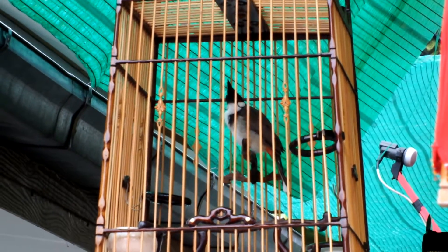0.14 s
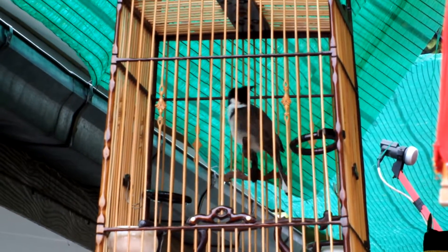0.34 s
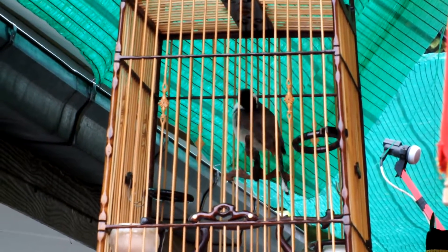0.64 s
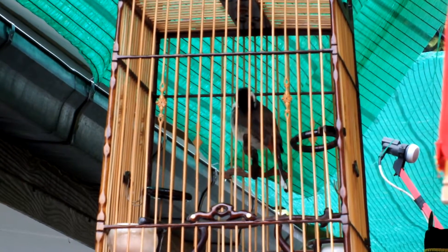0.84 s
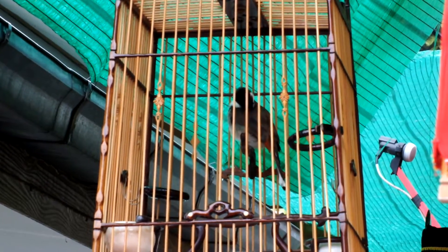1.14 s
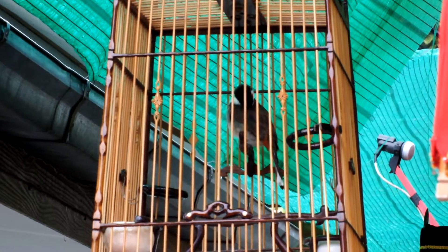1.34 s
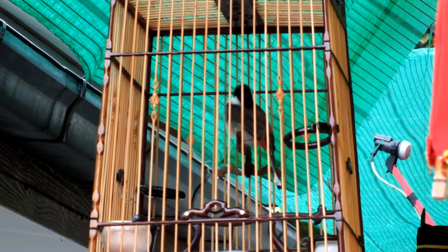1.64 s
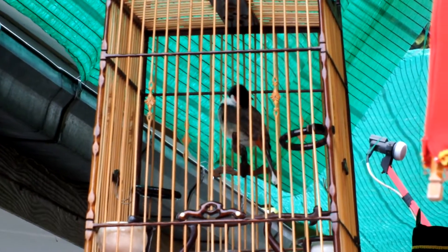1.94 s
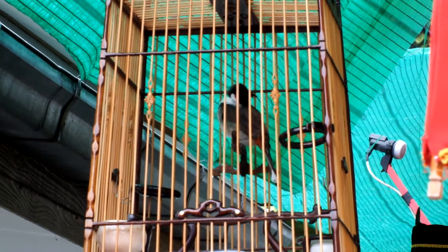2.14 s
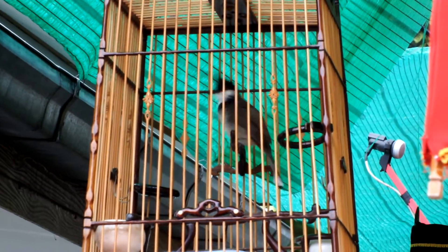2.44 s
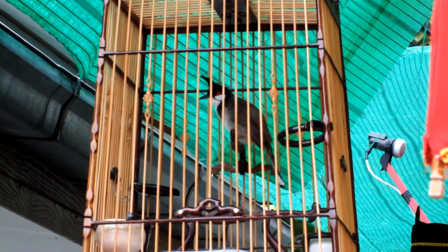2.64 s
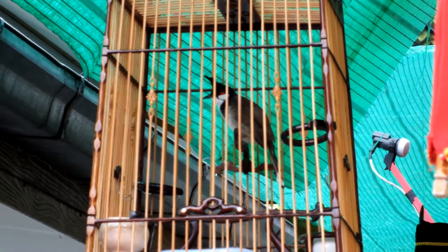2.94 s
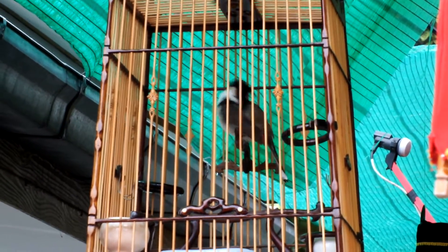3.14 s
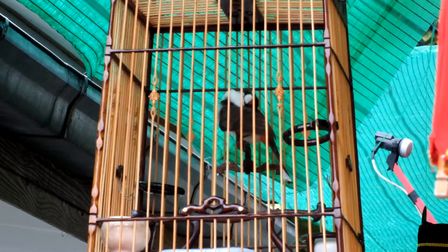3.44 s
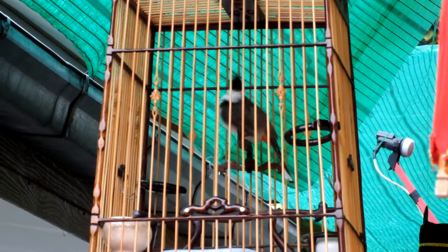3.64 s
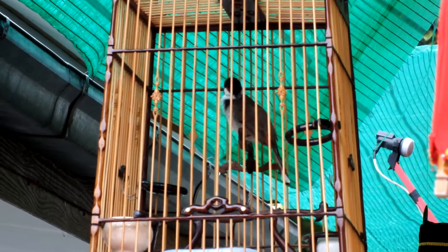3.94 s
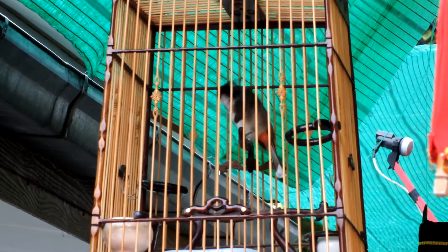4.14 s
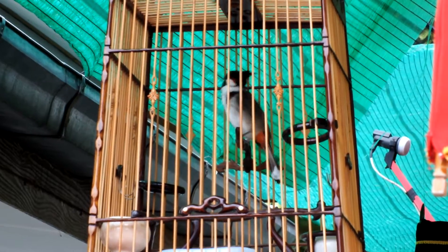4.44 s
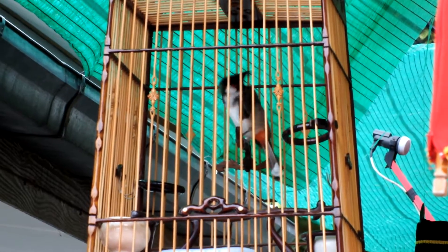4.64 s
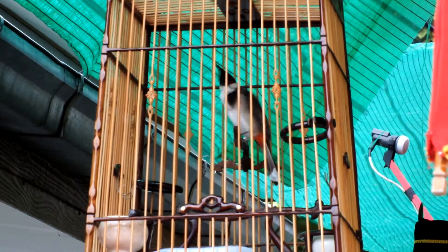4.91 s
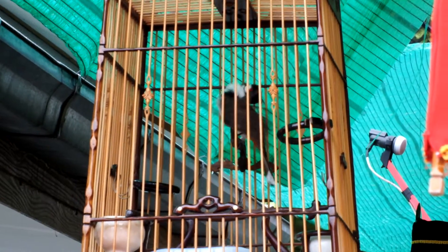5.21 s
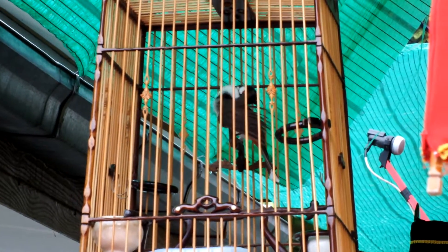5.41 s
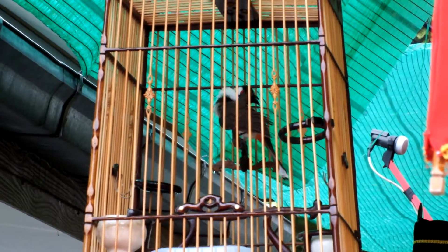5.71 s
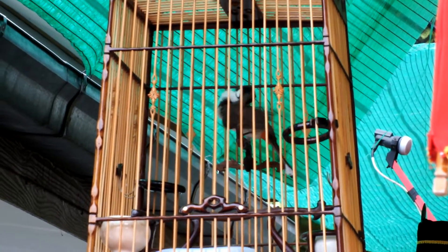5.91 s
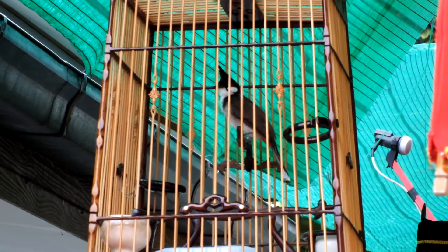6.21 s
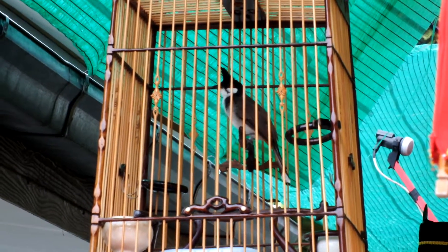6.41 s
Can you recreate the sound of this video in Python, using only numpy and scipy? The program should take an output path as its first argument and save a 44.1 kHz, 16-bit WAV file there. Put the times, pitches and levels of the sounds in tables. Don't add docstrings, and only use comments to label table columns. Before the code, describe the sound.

A caged songbird whistles quick, gliding phrases close by, ringing under a metal roof, while fainter birds answer over soft town rumble and insect buzz.

```python
import sys
import numpy as np
from scipy import signal
from scipy.fft import rfft, irfft, next_fast_len
from scipy.io import wavfile
from scipy.ndimage import uniform_filter1d, minimum_filter1d, map_coordinates

SR = 44100
rng = np.random.default_rng(int(sys.argv[2]) if len(sys.argv) > 2 else 0)


def magnitude_from_level(level_db):
    exponent = np.asarray(level_db, float) / 20
    return 10 ** exponent


def to_wav(s):
    ch = np.atleast_2d(s).T
    pcm = np.round(np.clip(ch, -1, 1) * 32767)
    wavfile.write(sys.argv[1], SR, pcm.astype(np.int16))


N = 289737


def unit(x):
    return x / np.sqrt(np.mean(x ** 2) + 1e-20)


def along(points, hz):
    point_hz, value = np.transpose(points)
    return np.interp(np.log(hz + 1), np.log(point_hz + 1), value)


def wobble(rate_hz):
    knots = rng.standard_normal(int(N * rate_hz / SR) + 4)
    return map_coordinates(knots, [np.arange(N) * rate_hz / SR])


def filtered(x, response):
    size = next_fast_len(N + SR // 2)
    hz = np.fft.rfftfreq(size, 1 / SR)
    return irfft(rfft(x, size) * response(hz), size)[..., :N]


def peak(f, hz, width):
    return 1j * f * width / (hz * hz - f * f + 1j * f * width)


def bowed(notes, share):
    return [(s, length, a, (a + c) / 2 * (1 + share), c, db) for s, length, a, c, db in notes]


def level(notes):
    return [(s, length, hz, hz, hz, db) for s, length, hz, db in notes]


def whistle(notes, edge, overtone_db, quiver):
    # multiple, level_db under the whistle
    overtones = [(2, -42), (3, -40.5), (4, -53.5), (5, -48.5), (6, -45.5), (7, -49.5)]
    # pitch_hz, gain_db
    beak = [(3000, 5), (4500, 1.5), (8000, -14), (10000, -7.5), (12300, 6.5), (14000, -8), (16000, -26)]
    out = np.zeros(N + SR)
    quiver, waver_db = np.tile(quiver, 2), np.tile(wobble(90), 2)
    for start_s, length, a, b, c, db in notes:
        at = max(round((start_s - edge / 2) * SR), 0)
        t = np.arange(int((length + edge) * SR)) / SR
        here = slice(at, at + len(t))
        u = np.clip(t / length, 0, 1)
        hz = a * (1 - u) * (1 - 2 * u) + 4 * b * u * (1 - u) + c * u * (2 * u - 1)
        shake = quiver[here]
        phase = 2 * np.pi * np.cumsum(hz * (1 + shake)) / SR
        tone = np.sin(phase)
        for multiple, db_under in overtones:
            gain = magnitude_from_level(db_under + overtone_db + along(beak, multiple * hz))
            tone = tone + gain * np.sin(round(multiple) * phase)
        nearest_end = np.minimum(t, t[-1] - t)
        shape = np.sin(np.pi / 2 * np.clip(nearest_end / edge, 0, 1)) ** 2
        loudness = np.sqrt(2) * magnitude_from_level(db + 3.9 * waver_db[here] + 39 * shake)
        out[here] += loudness * shape * tone
    return out[:N]


def place(x, pan_db, lag_s, wall_db, wet_db, alike, stretch):
    # pitch_hz, t60_s
    roof = [(800, 0.28), (2000, 0.36), (3500, 0.39), (6000, 0.31), (12000, 0.11)]
    # delay_s, level_db
    walls = [(.0042, -2), (.0093, 5), (0.0147, -7.5), (0.0175, -6), (0.0264, -14), (0.031, -14)]
    noise = rng.standard_normal((3, SR // 2 + SR // 4))
    hz, t, z = signal.stft(noise, SR, nperseg=256)
    fall_db = -60 * t / (stretch * along(roof, hz))[:, None]
    decay = magnitude_from_level(fall_db) + magnitude_from_level(0.39 * fall_db - 12.5)
    tails = signal.istft(z * decay, SR, nperseg=256)[1]
    alike = np.clip(alike, 0, 1)
    echo = np.sqrt(alike) * tails[0] + np.sqrt(1 - alike) * tails[1:]
    echo = np.pad(echo, ((0, 0), (130, 0)))
    echo *= magnitude_from_level(wet_db) / np.linalg.norm(tails[0])
    for delay_s, db in walls:
        echo[:, round(delay_s * SR)] += magnitude_from_level(db + wall_db + 2.5 * rng.standard_normal(2))
    wet = signal.fftconvolve(x[None], echo, axes=1)[:, :N]
    side = np.array([[0.5], [-0.5]])

    def ports(f):
        lag = side * lag_s / (1 + (f / 6500) ** 6)
        return magnitude_from_level(side * pan_db) * np.exp(-2j * np.pi * f * lag)

    return filtered(x + wet, ports)


def town_rumble():
    # time_s, level_db
    traffic = [(0, -52.5), (1.7, -54), (2.4, -51.5), (2.8, -53.5), (3.7, -53.5), (4.0, -52), (5.25, -51),
               (5.7, -55), (6.57, -50.5)]
    # pitch_hz, density_db per Hz
    air = [(15, -73.5), (28, -25.5), (45, -13), (110, -12), (400, -13), (800, -19), (1600, -24),
           (3000, -28.5), (4500, -33), (6300, -43), (9000, -47.5), (12000, -50.5), (14500, -62.5),
           (16000, -87.1)]
    # pitch_hz, correlation
    likeness = [(60, 0.83), (140, 0.64), (310, 0.58), (710, 0.4), (1620, -0.056), (3690, -0.25)]
    z = signal.stft(rng.standard_normal((2, N + 512)), nperseg=512)[2]
    patches = rng.standard_normal(z.shape[1:])
    patches = uniform_filter1d(uniform_filter1d(patches, 6, 0), 14, 1)
    pair = signal.istft(z * magnitude_from_level(0.71 * unit(patches)), nperseg=512)[1][:, :N]

    def spread(hz):
        angle = np.arccos(np.clip(along(likeness, hz), -1, 1)) / 2
        return magnitude_from_level(along(air, hz)) * np.array([np.cos(angle), np.sin(angle)])

    mid, side = filtered(pair, spread)
    time_s, traffic_db = np.transpose(traffic)
    rumble_db = np.interp(np.arange(N) / SR, time_s, traffic_db)
    gust_db = 0.9 * wobble(8)
    return magnitude_from_level(rumble_db + 3.5 + gust_db) * unit(np.array([mid + side, mid - side]))


def motor_hum():
    # pitch_hz, idle_db, swell_s, half_width_s, swell_db
    motors = [
        (71.3, -61.5, 0.77, 0.52, -46.5),
        (56, -57.5, 2.2, .5, -55.5),
        (115.3, -59, 5.3, 1, -56.5),
    ]
    t = np.arange(N) / SR
    hum = np.zeros(N)
    for hz, idle_db, swell_s, width, swell_db in motors:
        swell = magnitude_from_level(swell_db) * np.exp(-((t - swell_s) / width) ** 2)
        loudness = (magnitude_from_level(idle_db) + swell) * magnitude_from_level(-4.5 + 1.7 * wobble(4.6))
        phase = 2 * np.pi * np.cumsum(hz + 1.31 * wobble(5)) / SR
        hum += loudness * np.sqrt(2) * np.sin(phase)
    return hum


def insect_chorus():
    wings = rng.standard_normal(N) + 0.49 * rng.standard_normal((2, N))
    buzz = filtered(wings, lambda f: peak(f, 7420, 1090) ** 4)
    buzz = unit(magnitude_from_level(1.7 * wobble(180)) * buzz)
    return magnitude_from_level(-70.0 + 0.52 * wobble(1.0)) * buzz


def repertoire():
    # start_s, length_s, start_hz, end_hz, level_db
    falls = [(.11, 0.041, 3030, 2728, -29), (.348, .055, 3250, 2902, -32.5), (.79, .03, 2615, 2492, -27),
             (2.683, .025, 3110, 2830, -31), (.968, 0.061, 2123, 1808, -33.5),
             (2.523, .058, 3753, 2790, -27.5), (2.527, 0.022, 2974, 2827, -21.5),
             (2.716, .028, 2550, 2310, -24.5), (2.836, 0.028, 3910, 3480, -26),
             (3.525, .028, 2896, 2539, -19.5), (3.818, 0.035, 2735, 2050, -24.5),
             (3.848, 0.01, 3480, 3430, -39.5), (5.35, 0.0088, 3050, 1932, -31.5),
             (5.37, 0.044, 3600, 2897, -30.5), (5.405, .065, 3080, 2738, -28),
             (5.527, 0.036, 3030, 2807, -31), (5.697, 0.012, 4420, 3740, -25.5),
             (5.708, .06, 3715, 3512, -27), (5.881, 0.012, 2980, 2202, -38)]
    rises = [(.086, 0.035, 1426, 2704, -53.5), (0.329, 0.022, 2165, 3207, -32),
             (.589, 0.031, 3297, 3445, -27.5), (.672, 0.0218, 1435, 2630, -36.5),
             (.682, .02, 2138, 2280, -31), (.828, .036, 1360, 2450, -42), (.958, 0.027, 1537, 1835, -37),
             (1.272, .044, 1397, 1728, -35.5), (1.275, .04, 2770, 3450, -50), (1.3, .025, 2330, 2830, -39),
             (1.316, .012, 1675, 2550, -29), (1.328, 0.02, 2582, 2680, -15.5),
             (2.95, .045, 2850, 3400, -30.5), (3.19, 0.012, 2457, 2780, -26),
             (3.296, 0.017, 2175, 2313, -26), (3.878, .05, 2085, 2470, -29), (5.372, .06, 2360, 2520, -36),
             (5.908, 0.031, 1940, 2048, -27.5)]
    arches = [(.692, .045, 2690, 2773, -28.5), (.872, .04, 2892, 2885, -30.5),
              (5.551, 0.055, 2035, 2376, -31), (5.667, 0.019, 2773, 2888, -24.5),
              (5.889, .022, 2252, 2150, -28), (5.977, 0.049, 2198, 2440, -24.5)]
    dips = [(.76, 0.034, 3170, 3100, -36), (.828, .03, 2630, 2655, -29.5), (.885, 0.053, 2152, 2213, -34),
            (1.362, 0.023, 2807, 2780, -25.5), (2.476, .046, 2557, 2660, -23),
            (2.575, 0.025, 1820, 2090, -37.5), (2.59, 0.031, 2774, 2723, -29.5),
            (2.815, .022, 2686, 3094, -24.5), (2.935, .018, 3240, 2765, -30),
            (3.311, 0.02, 2852, 2636, -22.5), (3.564, 0.035, 2600, 2373, -27.5),
            (5.43, .04, 2630, 2607, -34.5), (5.997, 0.028, 3177, 2660, -33.5)]
    # start_s, length_s, pitch_hz, level_db
    holds = [(.002, 0.029, 3420, -36.5), (.153, 0.034, 2686, -27.5), (3.338, 0.03, 2502, -32),
             (.455, 0.037, 2244, -26), (.541, 0.026, 2052, -34), (.569, 0.021, 2630, -29),
             (.579, 0.029, 3030, -37), (2.6, .045, 2095, -33), (2.865, 0.067, 3497, -28.5),
             (2.99, .035, 3537, -33.5), (3.203, 0.091, 3217, -28)]
    # start_s, top_hz, level_db
    flicks = [(.1, 3040, -30.5), (.337, 3470, -39.5), (.443, 2050, -53), (.575, 3550, -26.5),
              (.868, 3850, -42.5), (1.476, 3770, -45.5), (2.47, 2570, -43), (2.516, 3894, -35),
              (2.805, 2170, -41), (2.83, 4034, -34), (3.194, 3486, -28), (3.521, 3096, -28.5),
              (5.361, 3526, -27.5), (5.661, 3010, -34), (5.681, 4280, -28.5)]
    flick_s, start_over_top = 0.01006, 0.63
    flicks = [(s, flick_s, start_over_top * hz, hz, db) for s, hz, db in flicks]
    glides = bowed(falls + rises + flicks, 0)
    return glides + bowed(arches, 0.0728) + bowed(dips, -0.0535) + level(holds)


def burr():
    # start_s, end_s, pitch_swing (0-1)
    burrs = [(0.339, 0.408, 0.07), (0.893, 1.043, 0.05), (2.524, 2.66, .04), (2.939, 3.02, 0.04),
             (3.801, 3.933, 0.05), (5.362, 5.46, 0.04), (5.544, 5.623, 0.05)]
    t = np.arange(N) / SR
    swing = sum(depth * np.interp(t, [a - 0.008, a, b, b + 0.006], [0, 1, 1, 0]) for a, b, depth in burrs)
    return swing * np.sin(2 * np.pi * np.cumsum(115 + 25 * wobble(30)) / SR)


def hiss(song, db):
    effort = np.sqrt(np.abs(uniform_filter1d(song ** 2, 200)))
    breath = filtered(rng.standard_normal(N),
                      lambda f: peak(f, 11500, 4500) ** 4 + 0.25 * peak(f, 5200, 2500) ** 2)
    return song + magnitude_from_level(db) * effort * unit(breath)


def singer():
    quiver = burr() + 0.012 * wobble(170)
    song = magnitude_from_level(-1.5) * whistle(repertoire(), edge=0.006, overtone_db=5, quiver=quiver)
    return place(hiss(song, db=-49.5), pan_db=-5, lag_s=0.000102, wall_db=-6, wet_db=-1.47,
                 alike=0.27, stretch=0.61)


def neighbours():
    # start_s, start_hz, end_hz, level_db
    chirps = [(.222, 3540, 3310, -50.5), (0.311, 2300, 2700, -51), (0.376, 2870, 2680, -43.5),
              (0.412, 2077, 2293, -40.5), (.525, 2787, 2290, -37.5), (1.062, 3560, 3150, -56),
              (1.245, 2440, 2643, -46), (1.495, 3154, 2754, -43), (1.528, 2323, 2250, -41.5),
              (2.04, 1790, 2504, -59.5), (2.06, 2260, 1930, -62), (2.493, 2133, 2360, -30),
              (3.168, 1570, 2250, -45.5), (3.171, 2530, 3220, -42), (3.668, 3250, 2740, -54),
              (3.698, 3600, 4100, -57), (4.032, 2660, 2513, -51), (4.177, 2590, 3410, -53),
              (4.365, 1795, 2035, -58.5), (4.396, 2473, 2310, -50.5), (4.497, 3104, 2690, -46),
              (4.535, 3410, 3890, -56), (4.675, 3560, 3345, -46), (4.785, 2110, 2270, -58.5)]
    # start_s, length_s, pitch_hz, level_db
    peeps = [(.058, .028, 2800, -47), (.165, 0.045, 1786, -64), (1.387, 0.022, 1965, -43.5),
             (1.62, 0.097, 4216, -65.5), (2.92, 0.024, 1464, -56), (3.356, 0.022, 3000, -43),
             (3.71, 0.052, 1525, -56), (3.957, 0.027, 1538, -56.5), (4.179, 0.042, 3025, -41.5),
             (4.462, .012, 2390, -56), (4.62, 0.043, 1772, -60), (4.63, .04, 2980, -56),
             (4.71, 0.046, 3310, -72), (4.864, .032, 2562, -44.5), (5.47, 0.13, 1570, -64),
             (5.652, 0.007, 1714, -40), (5.966, 0.013, 1620, -43.5)]
    down_s, up_s = 0.037, 0.026
    chirps = [(s, down_s if a > c else up_s, a, c, db) for s, a, c, db in chirps]
    notes = bowed(chirps, 0) + level(peeps)
    calls = magnitude_from_level(-1) * whistle(notes, edge=0.0046, overtone_db=-2, quiver=0.025 * wobble(170))
    return place(calls, pan_db=-5.0, lag_s=-0.00011, wall_db=-7, wet_db=1.5, alike=0.36, stretch=0.46)


def claws():
    # start_s, peak_db
    ticks = [
        (.112, -41),
        (.556, -41),
        (1.65, -40),
        (3.3, -41),
    ]
    # pitch_hz, width_hz, level_db
    perch = [(900, 600, 0), (1900, 1200, -7), (4000, 2500, -20)]
    blows = np.zeros(N)
    for start_s, db in ticks:
        blows[round(start_s * SR)] = magnitude_from_level(db + 31)

    def cane(f):
        return sum((-1) ** k * magnitude_from_level(db) * peak(f, hz, width) ** 2 for k, (hz, width, db) in enumerate(perch))

    return place(filtered(blows, cane), pan_db=-1.0, lag_s=0.00001, wall_db=-7.0, wet_db=-7.5,
                 alike=0.25, stretch=0.55)


def dove():
    # start_s, length_s, start_hz, end_hz, level_db
    coos = [(2.465, 0.031, 846, 1008, -46.5), (2.49, .028, 1045, 1210, -47.5), (2.59, .03, 1248, 1137, -56),
            (2.65, 0.049, 1190, 1013, -50.5), (2.75, 0.084, 1152, 1053, -52.5),
            (2.84, 0.011, 1070, 1005, -55), (2.99, 0.12, 1095, 1102, -54), (3.292, 0.015, 1080, 1054, -40),
            (3.5, .19, 691, 758, -66), (3.72, 0.2, 758, 762, -49.5), (3.95, 0.306, 785, 784, -64.5),
            (6.245, 0.036, 906, 960, -54), (6.265, 0.15, 1152, 1175, -54.5), (6.44, 0.018, 1130, 1118, -43),
            (6.53, 0.047, 985, 1135, -50)]
    voice = whistle(bowed(coos, 0.0255), edge=0.021, overtone_db=-27.5, quiver=0.003 * wobble(100))
    return place(voice, pan_db=1.0, lag_s=0.00002, wall_db=-10.5, wet_db=-4.5, alike=0.79, stretch=1.0)


def distant_bird():
    # start_s, level_db
    sweeps = [(4.64 + .303 * k, -67) for k in range(7)]
    notes = [(s, 0.045, 6700, 4400, 2400, db + 3.0) for s, db in sweeps]
    voice = whistle(notes, edge=0.0036, overtone_db=-31, quiver=0.0087 * wobble(200))
    return place(voice, pan_db=-1.5, lag_s=0.00005, wall_db=-9, wet_db=8, alike=0.2, stretch=1.5)


def scene():
    bed = town_rumble() + motor_hum() + insect_chorus()
    return bed + singer() + neighbours() + claws() + dove() + distant_bird()


def band_limit(x):
    return signal.sosfilt(signal.butter(12, 15720, fs=SR, output="sos"), x)


def record(dry):
    need = np.minimum(1, magnitude_from_level(-7.5) / (np.abs(dry).max(0) + 1e-9))
    held = dry * uniform_filter1d(minimum_filter1d(need, size=441), size=441)
    loud = np.sqrt(np.abs(uniform_filter1d(np.mean(dry ** 2, 0), 2600)))
    return band_limit(held / (1 + loud / magnitude_from_level(-3.0)))


dry = scene()
out = record(dry)
to_wav(out)
```